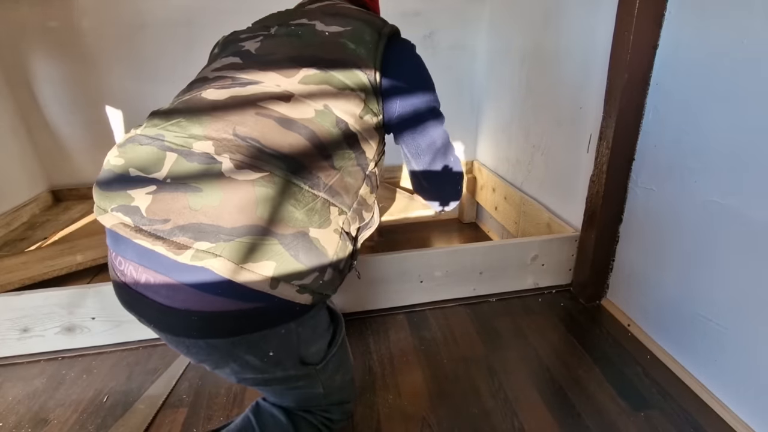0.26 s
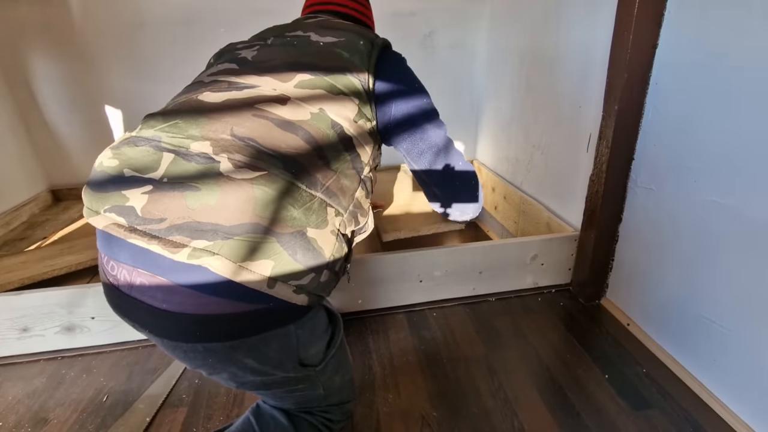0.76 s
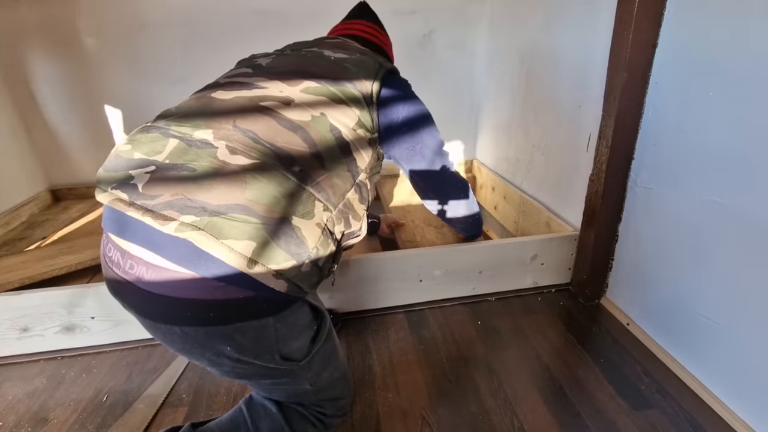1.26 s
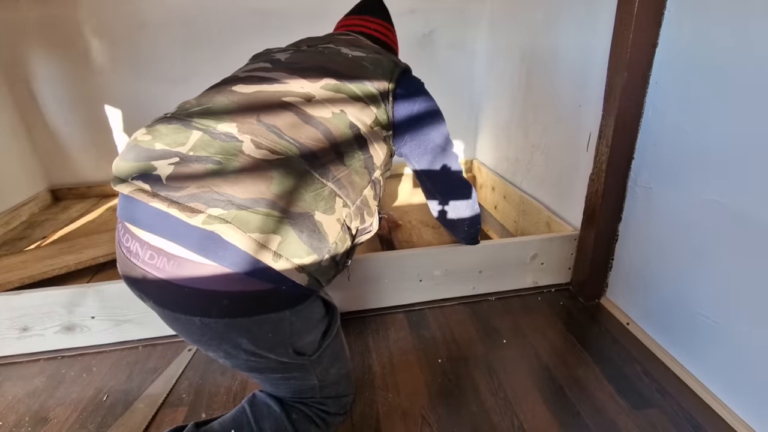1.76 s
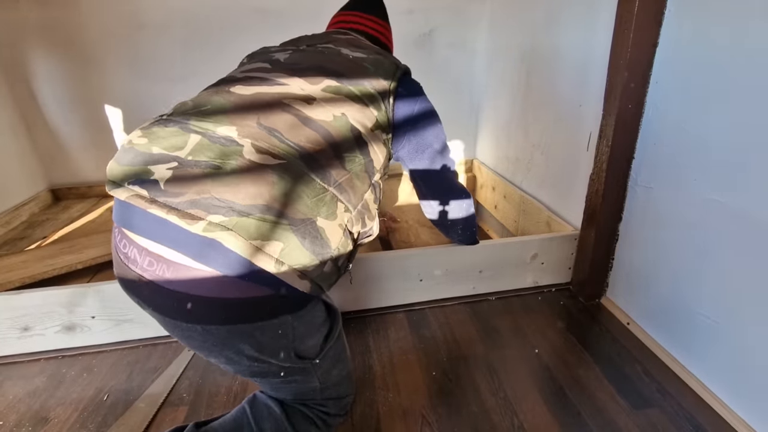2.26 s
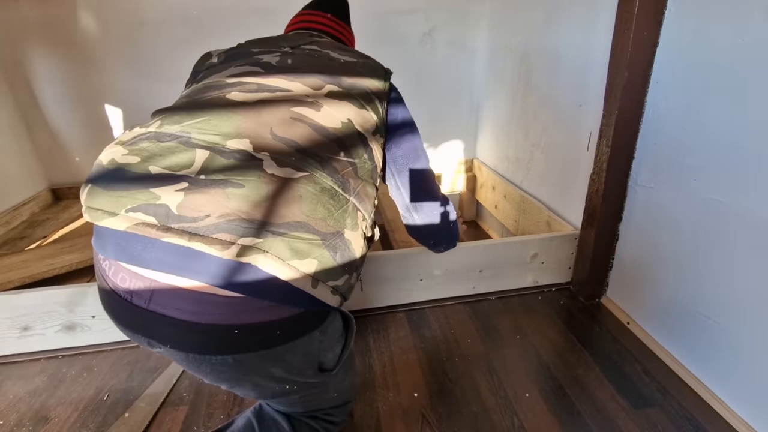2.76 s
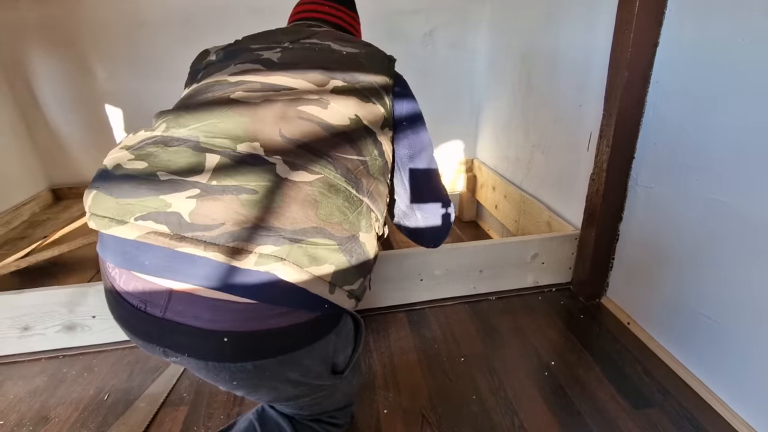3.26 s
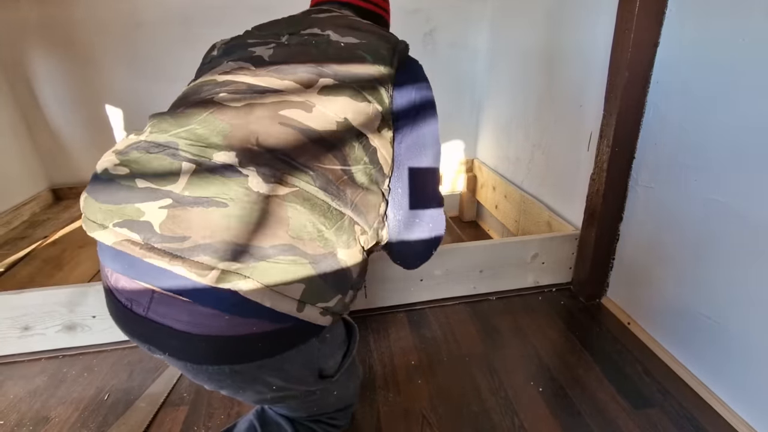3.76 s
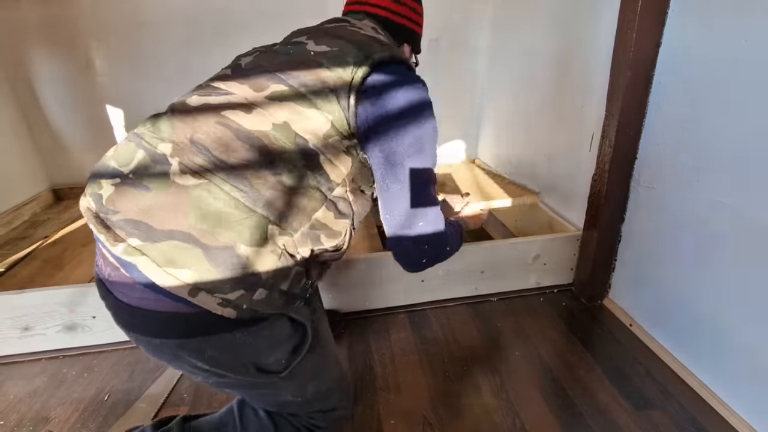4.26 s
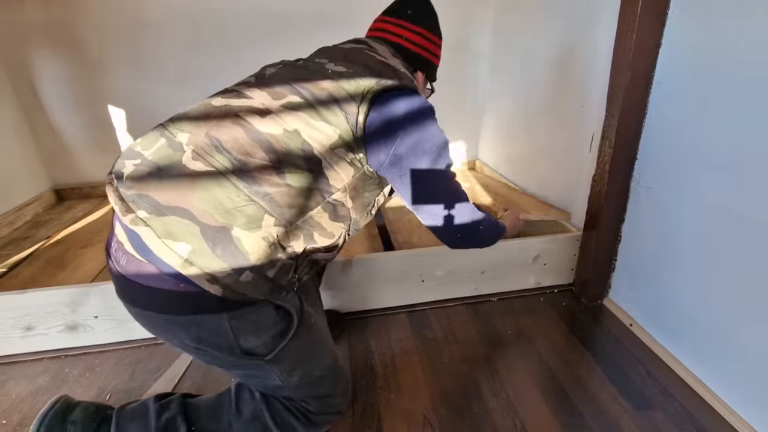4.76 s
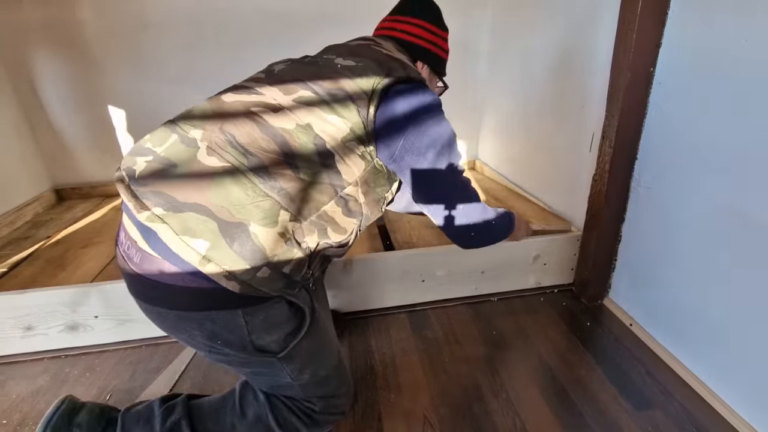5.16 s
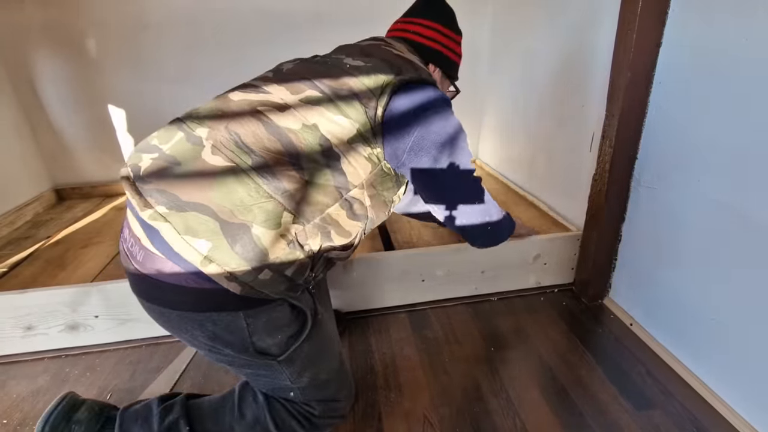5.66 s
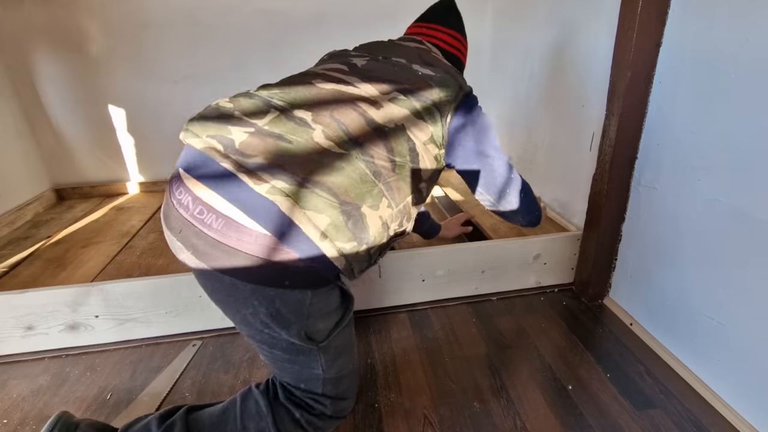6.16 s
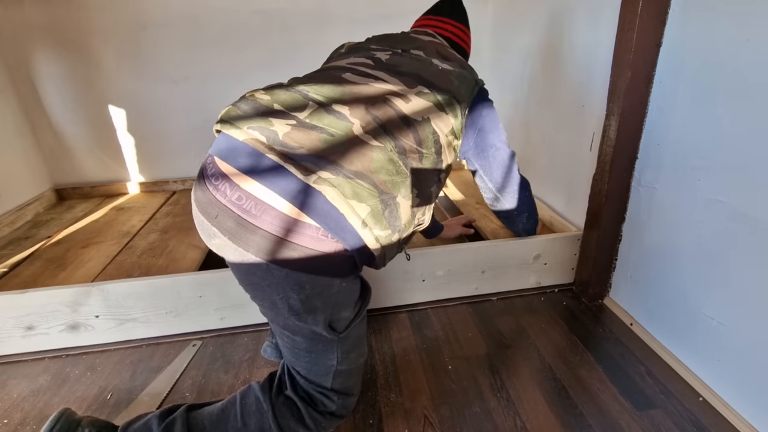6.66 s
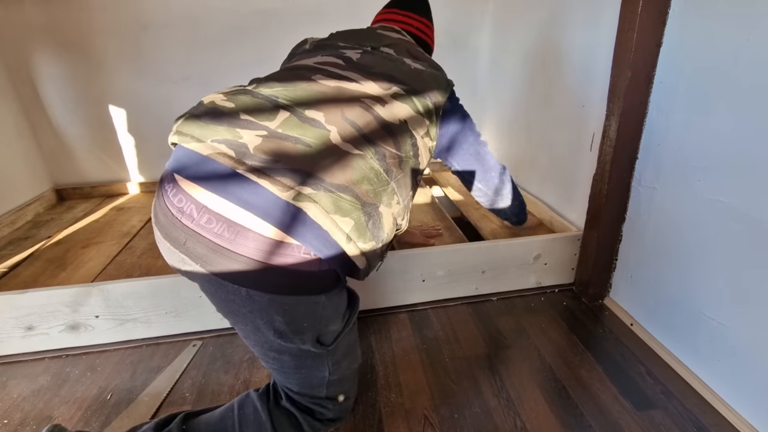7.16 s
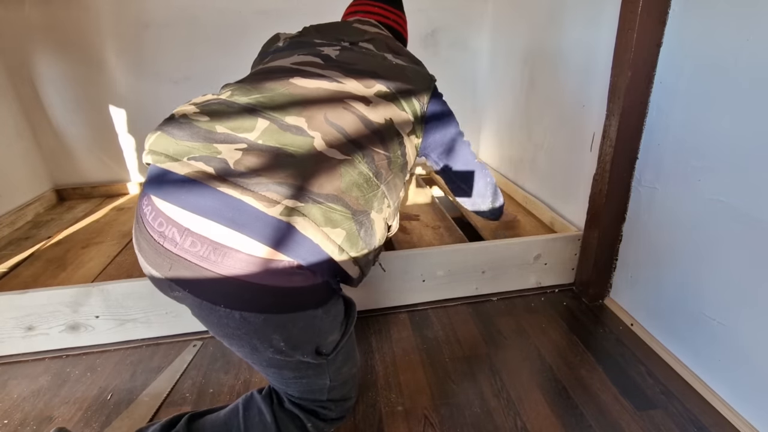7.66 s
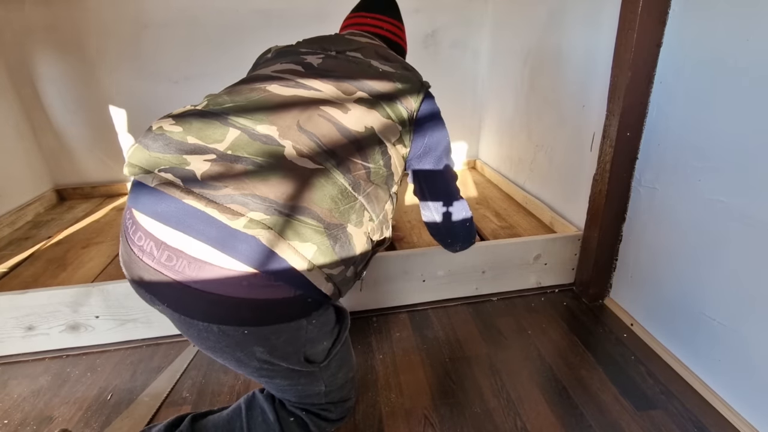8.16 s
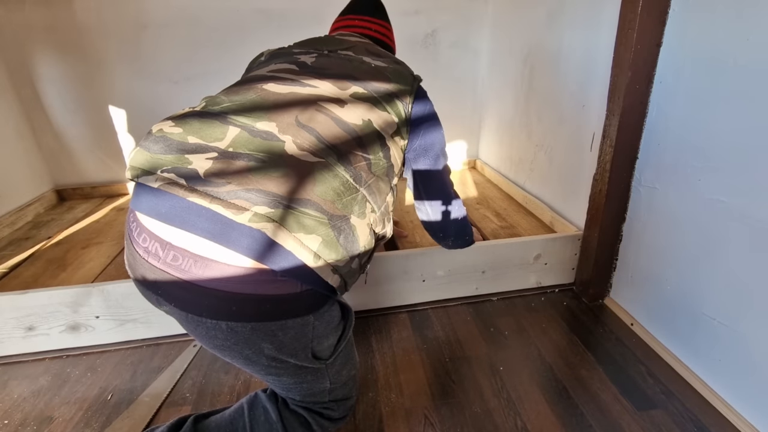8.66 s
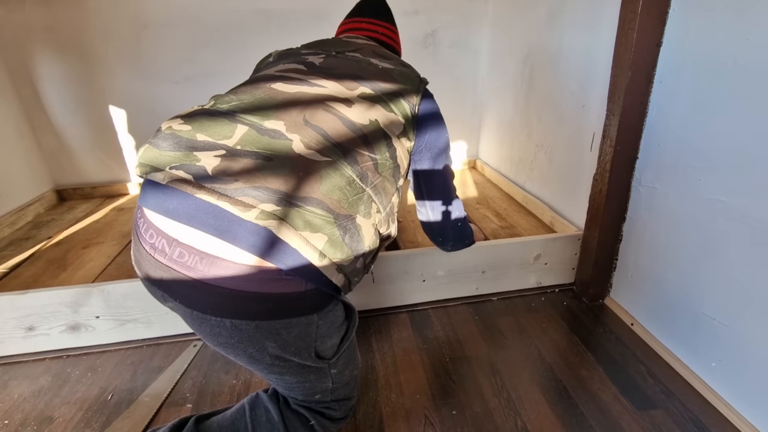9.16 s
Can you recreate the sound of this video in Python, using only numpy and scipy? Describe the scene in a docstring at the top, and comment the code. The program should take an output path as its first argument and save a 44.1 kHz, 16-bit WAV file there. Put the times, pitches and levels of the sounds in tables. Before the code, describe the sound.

Irregular woody knocks and dull floor thumps as planks are fitted by hand, with rubbing wood, faint squeaks and rustling work clothes.

```python
"""Wooden boards knock on a timber frame on the floor of a small bare room, as someone kneels and fits them.
Each knock, and one soft thump of a knee, is shaped noise coloured by wood and frame, plus fading tones.
Squeaks are narrow bands of noise; scuffs are short strokes of noise that wash away between the walls.
A sliding board and rustling work clothes are noise that follows each push, and the hollow floor booms
in low noise. A faint steady noise fills the room."""
import sys
import numpy as np
from scipy.fft import rfft, irfft, next_fast_len
from scipy.io import wavfile
from scipy.ndimage import map_coordinates

SR = 44100
rng = np.random.default_rng(int(sys.argv[2]) if len(sys.argv) > 2 else 0)


def digitize_waveform(pressure):
    """Quantize a signal to 16-bit integers and store it at the path in sys.argv[1].

    Rows of a 2-D input are taken as channels; values are limited to [-1, 1].
    """
    field = np.atleast_2d(pressure).T
    bounded = np.clip(field, -1, 1)
    quanta = np.round(bounded * 32767).astype(np.int16)
    wavfile.write(sys.argv[1], SR, quanta)


N = 414981

# a board meets the frame, or a knee lands with a soft thump (at 4.772 s):
# hit_s [s], force_db [dB], weight_db on the floor [dB], hardness [dB per octave],
# grit_db at the edge [dB], chatter_s [s], pitch_hz of the ringing [Hz]
FLOOR_KNOCKS = [(0.127, -24.5, -27, -5, -47.5, .03, 127), (0.145, -15.5, -17, 2, -40.5, 0.017, 420),
                (0.654, -40.5, -37.5, -6, -60.5, 0.013, 288), (1.034, -23.5, -19, 0.5, -54.5, 0.021, 463),
                (1.363, -21.5, -23, -3.5, -60, 0.021, 253), (1.76, -37, -25, -10, -57.5, 0.0078, 278),
                (2.17, -27, -24, -8.5, -65.5, 0.027, 284), (2.875, -49, -54, -7, -69.5, .028, 295),
                (2.943, -45, -54, -4.5, -70.5, 0.03, 127), (3.184, -32, -31.5, -0.5, -62, .025, 297),
                (3.196, -24, -22, -6, -57, .042, 132.8), (3.537, -53.5, -58, -8, -69, 0.0085, 378),
                (4.595, -28.5, -22.5, -2.5, -51, .024, 385), (4.739, -41.5, -29.5, -3, -54, .018, 385),
                (4.772, -49.5, -29, -6, -84, 0.016, 62), (4.866, -25, -24, -6, -58.5, 0.023, 174),
                (5.389, -27, -21, -17, -48.5, 0.031, 252), (5.502, -33.5, -25.5, -11, -50.5, 0.043, 272),
                (5.654, -31, -25, -3, -48, 0.038, 286), (5.899, -36.5, -26, -10.5, -52.5, .039, 214),
                (6.085, -36.5, -27, -17, -67.5, 0.0062, 324), (6.299, -11, -15.5, -0.5, -34.5, 0.038, 240),
                (6.725, -32, -29.5, -8, -54.5, 0.023, 277), (6.738, -24, -28.5, -4.5, -47, 0.0069, 279),
                (7.157, -20.5, -22, -4.5, -46, .023, 436), (7.467, -14.5, -19.5, -5, -37.5, 0.0084, 351),
                (7.884, -41, -41, -5, -63.5, 0.026, 290), (8.361, -31.5, -31, -6, -64.5, 0.023, 246),
                (8.378, -32.5, -46, -1, -66.5, 0.035, 178.2), (8.621, -48, -43, -15, -83, 0.0075, 242),
                (8.86, -32.5, -27.5, -9.5, -72.5, 0.042, 329), (9.345, -43, -29.5, -6.5, -56, 0.017, 304),
                (9.392, -29.5, -21, -11, -67, 0.0203, 278)]
# parts of a knock, from thud to snap: centre_hz [Hz], rise_s at usual softness [s],
# t60_s to fade by 60 dB [s], voice_db relative level [dB]
KNOCK_VOICES = [(94, 0.022, 0.53, -2), (271.7, 0.0072, 0.39, 0), (840, 0.00097, 0.29, -0.5),
                (2160, 0.0029, 0.25, 1.5), (4530, 0.0044, 0.23, 3)]

LEAD_S = .0001  # the right ear hears the work this much earlier
TOP_HZ = 15650  # nothing sounds above this


def amp(db):
    """Turn decibels into gain."""
    return 10 ** (np.asarray(db) / 20)


def unit(x):
    """Scale to an average (rms) strength of 1."""
    return x / np.sqrt(np.mean(x ** 2) + 1e-20)


def along(points, hz):
    """Read a curve of (Hz, value) points on a logarithmic pitch axis."""
    f, v = np.transpose(points)
    return np.interp(np.log(hz + 1), np.log(f + 1), v)


def wobble(rate, size):
    """Draw a smooth random curve through `rate` random points a second."""
    knots = rng.standard_normal(size // 16)
    return map_coordinates(knots, [np.arange(size) * rate / SR], mode="wrap")


def add(track, start_s, sound):
    """Mix a sound into the track at a given time."""
    start = max(round(start_s * SR), 0)
    part = track[:, start:start + sound.shape[1]]
    part += sound[:, :part.shape[1]]


def grid(size):
    """List the frequencies in the spectrum of this many samples."""
    return np.fft.rfftfreq(size, 1 / SR)


def ears(hz):
    """Weigh the shared and the opposed part of a sound in each ear; low sounds are more alike."""
    # how alike left and right are: pitch_hz [Hz], likeness [0 to 1]
    likeness = [(30, 0.97), (60, 1), (125, 0.96), (250, 0.97), (500, 0.63), (1000, 0.15), (4000, 0.083),
                (12000, 0.047)]
    turn = np.arccos(np.clip(along(likeness, hz), -1, 1)) / 2
    lead = np.exp(1j * np.pi * hz * LEAD_S * np.array([[-1], [1]]))
    shared = lead * np.cos(turn)
    opposed = lead * np.sin(turn) * np.array([[1], [-1]])
    return shared, opposed


def noise(gain, weights):
    """Make stereo noise of rms 1 with a given spectrum, from random phases."""
    mid, side = np.exp(2j * np.pi * rng.random((2, len(gain))))
    return unit(irfft(gain * (mid * weights[0] + side * weights[1])))


def comb(hz, depth_db, spacing=55):
    """Near walls and floor cut an uneven comb, with deep notches and low crests, into all but the bass."""
    knots = np.arange(0, SR / 2, spacing)  # Hz
    ripple = np.minimum(rng.standard_normal(len(knots)), 1.3)
    return amp(depth_db * np.interp(hz, knots, ripple) * hz / (hz + 500))


def frame(hz):
    """Frame and room resonate: each resonance lifts the pitches around its centre."""
    # resonances of frame and room: centre_hz [Hz], width_hz [Hz], level_db [dB]
    resonances = [(38.62, 4.8, 12), (57.34, 3.4, 14), (77.6, 3.5, 13.5), (124.7, 2.6, 8.5), (173.9, 11, 12),
                  (241.2, 19, 8.5), (283.4, 8.2, 9.5), (354, 11, 8.5), (433.3, 20, 1.5), (593, 5.6, 4.5),
                  (704, 41, 11.5), (793, 95, 8.5), (1140, 33, 6), (1242, 36, 9), (1529, 54, 3.5),
                  (2096, 470, 5)]
    gain = 1
    for centre_hz, width_hz, level_db in resonances:
        gain = gain + (amp(level_db) - 1) / (1 + (2 * (hz - centre_hz) / width_hz) ** 2)
    return gain


def ring(modes, t, free):
    """Sound (Hz, dB, t60) modes, held up in the chatter, then fading; the ears differ more in high ones."""
    out = 0
    for hz, db, t60 in modes:
        phase = rng.uniform(0, 2 * np.pi) + rng.normal(0, min(hz / 1200, 1), (2, 1))
        place_db = rng.normal(0, 1.5)  # each strike stirs each mode a little differently
        out = out + amp(db + place_db - 60 * free / t60) * np.sin(2 * np.pi * hz * t + phase)
    return out


def forces(force_db, weight_db, hardness, grit_db, crack_db=11, crack_follows=0.52):
    """Weight thuds, force sounds the body, a hard contact clacks, grit cracks and snaps."""
    octaves = np.log2(KNOCK_VOICES[2][0] / KNOCK_VOICES[1][0])
    clack_db = force_db + hardness * octaves
    return weight_db, force_db, clack_db, grit_db + crack_db + crack_follows * hardness, grit_db


def knocks(settle=0.033, room_db=-5, bend_db=-5.5, bend_db_per_octave=-9, loose_db=-1, held_db=-22,
           graze_db=-17, graze=0.0058, usual_chatter=0.034, low_lasts=0.53, across_follows=1.2):
    """A board (once a knee) grazes, hits, chatters briefly, settles and dies in the room, the bass last."""
    # ringing of a loose board: pitch_hz [Hz], level_db [dB], t60_s [s]
    loose_modes = [(335, -9, .16), (688, 0, .2), (712, -5, .16), (1118, -7, .18), (1150, -13, .15),
                   (2170, -22, .14)]
    # bending of a struck board: multiple of its pitch [times], level_db [dB], t60_s for a usual pitch [s]
    bending_modes = [(1, 0, .43), (2.78, -9, .33), (5.4, -23, .2)]
    # ringing across the grain: pitch_hz of a usual board [Hz], level_db [dB], t60_s [s]
    cross_modes = [(561, -16.5, 0.28), (811, -12.5, 0.084), (1568, -15.5, 0.14), (2198, -25.5, .13)]
    # colour of struck wood: pitch_hz [Hz], level_db [dB per Hz]
    wood_curve = [(10, -44), (25, -15.5), (45, -11), (100, -6), (160, -8.5), (300, -4.5), (500, -4),
                  (750, -9.5), (1200, -9.5), (1800, -20), (3000, -29), (5000, -40), (9000, -46.5),
                  (15000, -51.5)]
    loose_from_s, loose_until_s = 4.8, 6.0  # one board lies loose and rings freely
    ring_rise_s = .0045  # rings build up over a few cycles, at usual softness
    board_spread = .014  # share of pitch by which boards differ across the grain
    lead_in = .05  # s of graze before the hit
    out, hz = np.zeros((2, N)), grid(SR)
    clock = np.arange(SR) / SR - lead_in
    t = np.maximum(clock, 0)
    early = (clock > 0) & (clock < lead_in)
    weights = ears(hz)
    wood = amp(along(wood_curve, hz)) * frame(hz)
    centres = np.array(KNOCK_VOICES)[:, 0]
    usual_hz = centres[1]
    # neighbouring voices cross-fade along the pitch axis
    shares = [np.sin(np.pi / 2 * along(np.c_[centres, one], hz)) ** 2 for one in np.eye(len(centres))]
    for hit_s, force_db, weight_db, hardness, grit_db, chatter_s, pitch_hz in FLOOR_KNOCKS:
        softness = np.sqrt(chatter_s / usual_chatter)  # what lands slowly also sounds slowly
        after = np.maximum(t - chatter_s, 0)

        dull_db = min(.75 * hardness + 3.3, 0)  # a soft contact hardly stirs the overtones
        lasting = (usual_hz / pitch_hz) ** low_lasts  # low pitches ring longest
        bends = [(pitch_hz * k, db + dull_db * np.log2(k), t60 * lasting) for k, db, t60 in bending_modes]
        bending = ring(bends, t, after)
        bending_db = bend_db + bend_db_per_octave * np.log2(pitch_hz / usual_hz)  # long, low boards flex most

        size = 1 + board_spread * rng.standard_normal()
        crosses = [(f * size, db + across_follows * hardness * np.log2(f / usual_hz), t60)
                   for f, db, t60 in cross_modes]
        across = ring(crosses, t, after)

        ring_db = loose_db if loose_from_s < hit_s < loose_until_s else held_db
        ringing = amp(bending_db) * bending + amp(ring_db) * ring(loose_modes, t, after) + across
        blow = amp(force_db) * ringing * (1 - np.exp(-(t / ring_rise_s / softness) ** 2))

        contact = np.exp(-after / settle)
        grazing = amp(graze_db) * np.exp(-(clock / graze / softness) ** 2)
        colour = wood * comb(hz, depth_db=5.5)
        levels = forces(force_db, weight_db, hardness, grit_db)
        for share, (_, rise_s, t60_s, voice_db), level_db in zip(shares, KNOCK_VOICES, levels):
            rising = 1 - np.exp(-(t / rise_s / softness) ** 2)
            envelope = grazing + rising * (contact + amp(room_db - 60 * after / t60_s))
            voice = noise(colour * share, weights) * envelope
            blow = blow + amp(level_db + voice_db) * voice / np.std(voice[:, early])
        add(out, hit_s - lead_in, blow)
    return out


def scuffs(hold=0.027, t60=0.24, grain_db=1.5):
    """A short stroke of hand, sleeve or wood swells, breaks off and washes away between the walls."""
    # strokes: peak_s when the swell is full [s], level_db [dB], brightness [dB per octave], swell_s [s]
    strokes = [(0.336, -59.5, -6, 0.03), (0.444, -61.5, -4, 0.02), (0.577, -48, -5, 0.0075),
               (0.985, -64, -1, 0.01), (1.719, -50.5, -3, 0.032), (1.765, -46.5, -4, 0.046),
               (1.98, -56.5, -3, 0.026), (2.134, -47.5, -4, 0.034), (2.45, -50.5, -4.5, 0.057),
               (3.006, -50.5, -4.5, 0.012), (3.175, -45.5, -2, 0.013), (3.36, -47.5, -6.5, 0.013),
               (3.644, -54.5, -2, 0.024), (4.745, -52.5, -2.5, 0.013), (5.29, -42.5, -5, 0.045),
               (5.891, -46, -3.5, 0.032), (6.22, -54, -3.5, 0.019), (6.52, -66.5, -2.5, 0.021),
               (7.761, -56, -6, 0.016), (8.015, -56.5, -2.5, 0.061), (8.101, -60.5, -32, 0.021),
               (8.339, -59, -2, 0.01), (8.565, -51, -5, 0.011), (8.7, -50, -4.5, 0.024),
               (8.836, -54.5, -5, 0.028), (9.14, -51, -6, 0.022), (9.29, -49.5, -4.5, 0.027)]
    # colour of a stroke: pitch_hz [Hz], level_db [dB per Hz]
    stroke_curve = [(200, -1.5), (700, -2), (1400, -6), (2300, -6), (3200, -7.5), (5500, -8), (9000, -11.5),
                    (15000, -17)]
    out, hz = np.zeros((2, N)), grid(SR // 2)
    lead_in = .15  # s ahead of the peak, room for the swell
    t = np.arange(SR // 2) / SR - lead_in
    weights, octaves = ears(hz), np.log2(np.maximum(hz, 1200) / 1200)
    for peak_s, level_db, brightness, swell_s in strokes:
        colour = amp(along(stroke_curve, hz) + brightness * octaves) * comb(hz, depth_db=8)
        swell = np.exp(-(np.minimum(t, 0) / swell_s) ** 2)
        fade = amp(-60 * np.maximum(t - hold, 0) / t60)
        grain = amp(level_db + grain_db * wobble(200, len(t)))
        add(out, peak_s - lead_in, grain * swell * fade * noise(colour, weights))
    return out


def squeaks(width_share=0.1, t60=0.26):
    """A board sticks and slips on its neighbour: a brief, rough band of tone that fades in the room."""
    # squeaks and groans: peak_s when the swell is full [s], pitch_hz [Hz], level_db [dB], swell_s [s]
    squeak_rows = [(2.455, 1240, -44.5, 0.016), (5.155, 286, -35.5, 0.043), (5.276, 297, -38.5, 0.032),
                   (6.0, 1600, -57, .015), (8.015, 2930, -59, 0.019)]
    out, t, hz = np.zeros((2, N)), np.arange(SR // 2) / SR, grid(SR // 2)
    middle = t.mean()
    for peak_s, pitch_hz, level_db, swell_s in squeak_rows:
        tone = noise(1 / (1 + ((hz / pitch_hz - 1) / width_share) ** 4), ears(hz))
        swell = np.exp(-(np.minimum(t - middle, 0) / swell_s) ** 2)
        fade = amp(-60 * np.maximum(t - middle, 0) / t60)
        add(out, peak_s - middle, amp(level_db) * tone * swell * fade)
    return out


def wandering(colour, hz, weights, depth_db, rate, count):
    """A moving contact point: noise fades between the combs of several places."""
    nearness = np.exp([2 * wobble(rate, N) for place in range(count)])
    nearness /= np.linalg.norm(nearness, axis=0)
    return sum(near * noise(colour * comb(hz, depth_db), weights)[:, :N] for near in nearness)


def swells(rows):
    """Join (s, dB, swell s) movements that each rise and fall smoothly into one gain."""
    t = np.arange(N) / SR
    gains = [amp(db) * np.exp(-((t - peak_s) / swell_s) ** 2) for peak_s, db, swell_s in rows]
    return np.linalg.norm(gains, axis=0)


def sway():
    """The hollow floor's boom swells to a peak after each knock, by the weight set down, and dies slowly."""
    boom_db, usual_weight_db, grows = -34, -24.5, 0.47  # dB at the usual weight, dB, dB per dB
    peak_delay_s, swell_s, t60_s = 0.09, 0.071, 1.44
    power = np.zeros(N)
    for hit_s, _, weight_db, *_ in FLOOR_KNOCKS:
        t = np.arange(N) / SR - hit_s - peak_delay_s
        level_db = boom_db + grows * (weight_db - usual_weight_db)
        fade = amp(level_db - 60 * np.maximum(t, 0) / t60_s)
        power += (fade * np.exp(-(np.minimum(t, 0) / swell_s) ** 2)) ** 2
    return np.sqrt(power)


def handling(rub_db=1, sleeve_db=-11, slide_sleeve_db=-16, slide_boom_db=4, catch_db=1.34, crease_db=0.7):
    """Rough wood catches as it slides, cloth creases with every push, and the hollow floor sways."""
    # a board is nudged and rubs briefly: peak_s [s], level_db [dB], swell_s [s]
    nudge_rows = [(0.07, -47, 0.077), (1.3, -53.5, 0.1), (1.97, -50.5, 0.106), (2.97, -58.5, 0.313),
                  (3.3, -49, 0.089), (3.69, -54.5, 0.061), (3.87, -62.5, 0.15), (4.58, -54.5, 0.17),
                  (7.99, -62, 0.12), (8.25, -60, 0.122), (8.73, -56, 0.088), (9.37, -49, .1)]
    # the loose board is worked along the joists: time_s [s], pressure_db [dB]
    slide_curve = [(4.8, -59), (4.92, -59), (5.04, -50), (5.15, -42), (5.21, -48), (5.299, -42.5),
                   (5.4, -45.5), (5.53, -38.5), (5.7, -48), (5.81, -57.5), (5.94, -41), (6.25, -69)]
    # the worker moves and the clothes rustle: peak_s [s], level_db [dB], swell_s [s]
    move_rows = [(0.3, -61, .06), (2.62, -67.5, .13), (3.02, -63, 0.22), (3.87, -63, 0.1),
                 (4.3, -59.5, 0.22), (4.55, -53.5, 0.11), (4.95, -46, 0.076), (5.2, -54, .2),
                 (9.11, -64, .03), (9.39, -52.5, 0.022)]
    # colours of rubbing wood, cloth and floor boom: pitch_hz [Hz], level_db [dB per Hz]
    rub_curve = [(80, -23), (170, -1.5), (330, 2.5), (550, -6), (1000, -7.5), (2100, -12), (3200, -20.5),
                 (6000, -29.5), (15000, -47.5)]
    cloth_curve = [(200, -13.5), (1200, 2.5), (3000, 2), (5000, -4), (8000, -5), (11000, -9.5), (15000, -9)]
    boom_curve = [(8, -43.5), (22, -11), (35, 0.5), (75, -4.5), (125, -7), (200, -24.5), (400, -35),
                  (1000, -63)]
    hz = grid(2 * next_fast_len(N // 2 + 1))
    weights, body = ears(hz), frame(hz)
    nudging = swells(nudge_rows)
    times_s, pressure_db = np.transpose(slide_curve)
    sliding = amp(np.interp(np.arange(N) / SR, times_s, pressure_db, left=-np.inf, right=-np.inf))
    rubbing = np.hypot(nudging, sliding)
    rustling = np.hypot(swells(move_rows), amp(sleeve_db) * nudging + amp(slide_sleeve_db) * sliding)
    swaying = np.hypot(sway(), amp(slide_boom_db) * sliding)
    # a board held in the hands stirs the frame only half as much (in dB), hence the root
    rub_colour = amp(along(rub_curve, hz)) * np.sqrt(body)
    rub = wandering(rub_colour, hz, weights, depth_db=11.5, rate=7.6, count=5)
    cloth = wandering(amp(along(cloth_curve, hz)), hz, weights, depth_db=6.5, rate=5.7, count=3)
    boom = noise(amp(along(boom_curve, hz)) * body, weights)[:, :N]
    catches = unit(amp(catch_db * wobble(90, N)))
    creases = unit(amp(crease_db * wobble(300, N)))
    return amp(rub_db) * rubbing * catches * rub + rustling * creases * cloth + swaying * boom


def hush(level_db=-60.5):
    """The still air of the room is a faint steady noise, strongest in the bass."""
    # colour of the still air: pitch_hz [Hz], level_db [dB per Hz]
    air_curve = [(25, 7.5), (170, -16), (500, -15.5), (1500, -20.5), (4000, -30), (15000, -41.5)]
    hz = grid(2 * next_fast_len(N // 2 + 1))
    return amp(level_db) * noise(amp(along(air_curve, hz)), ears(hz))[:, :N]


def scene():
    """Add up knocks, scuffs, squeaks, handling and the hush of one room."""
    return knocks() + scuffs() + squeaks() + handling() + hush()


def record(dry):
    """Round off the loudest peaks and let nothing pass above the band limit."""
    rounded = dry / (1 + dry ** 6) ** (1 / 6)
    size = next_fast_len(N + SR // 2)
    return irfft(rfft(rounded, size) * (grid(size) < TOP_HZ), size)[:, :N]


dry = scene()
out = record(dry)
digitize_waveform(out)
```